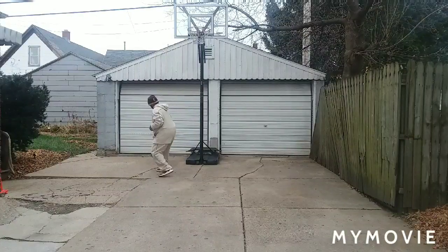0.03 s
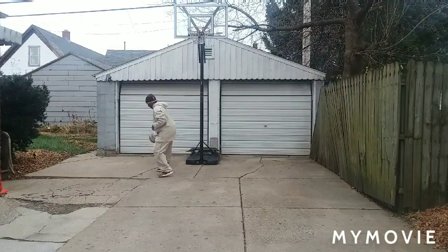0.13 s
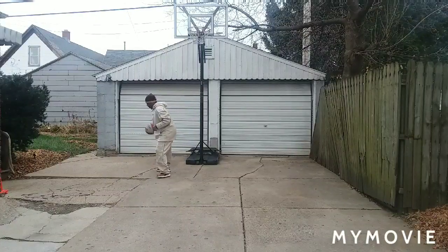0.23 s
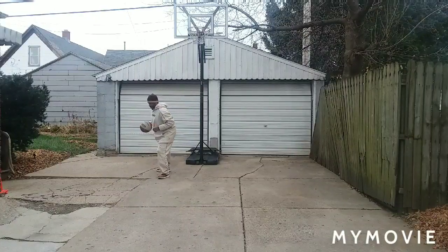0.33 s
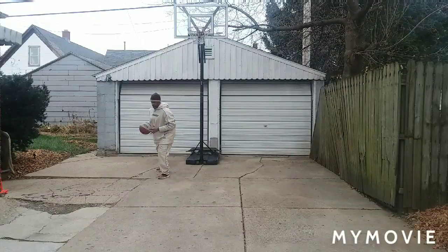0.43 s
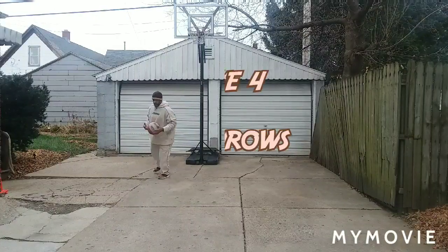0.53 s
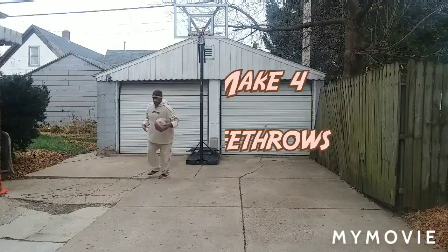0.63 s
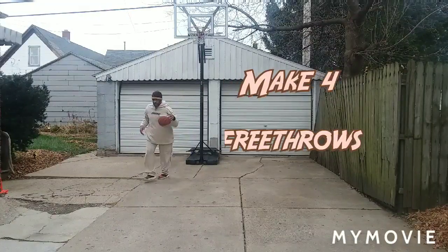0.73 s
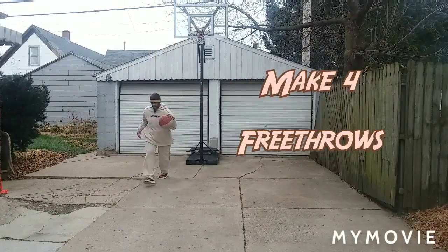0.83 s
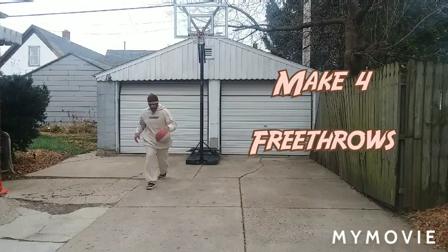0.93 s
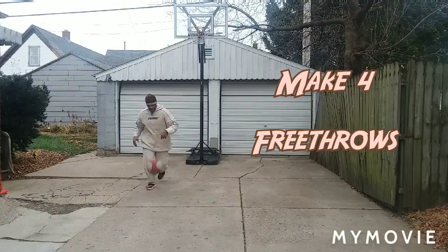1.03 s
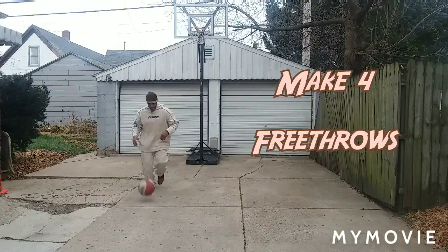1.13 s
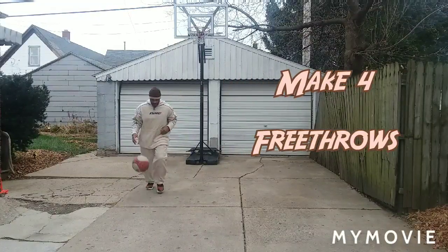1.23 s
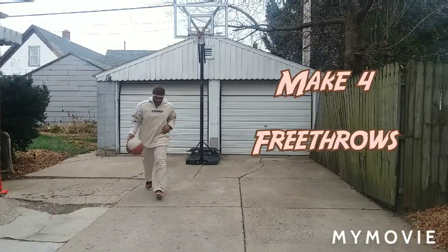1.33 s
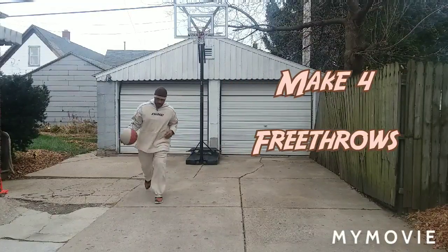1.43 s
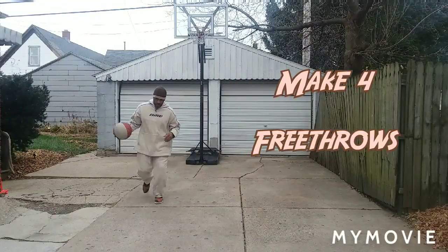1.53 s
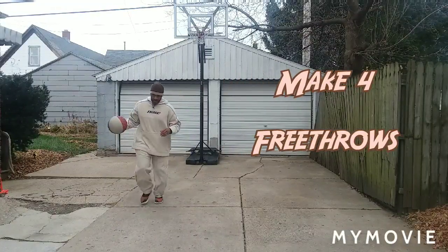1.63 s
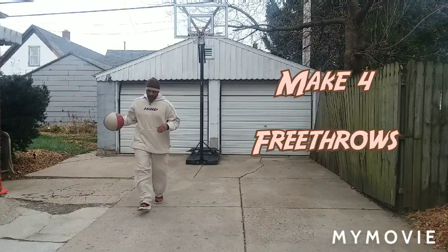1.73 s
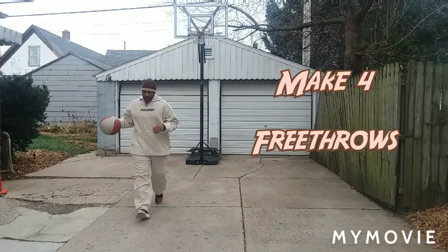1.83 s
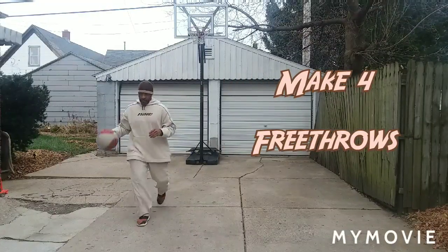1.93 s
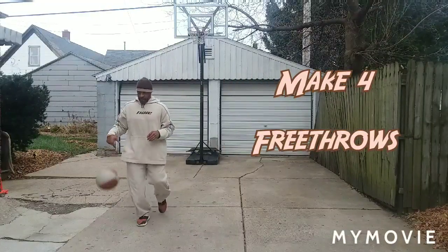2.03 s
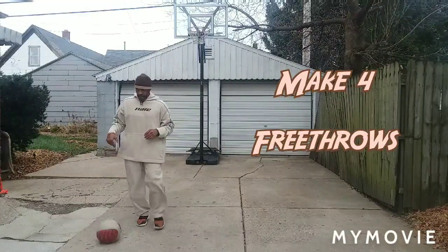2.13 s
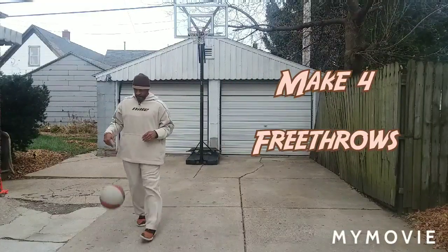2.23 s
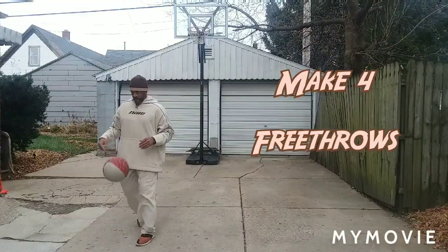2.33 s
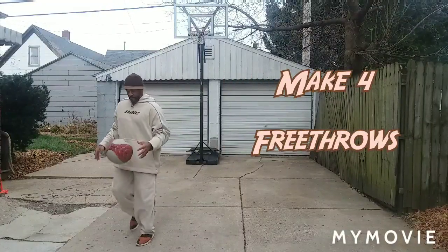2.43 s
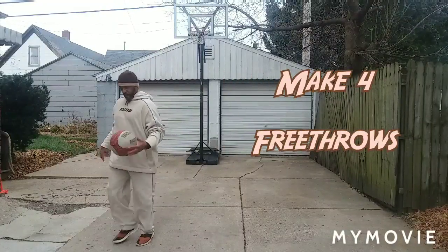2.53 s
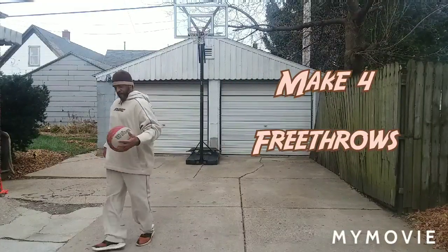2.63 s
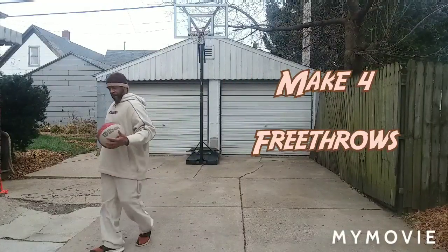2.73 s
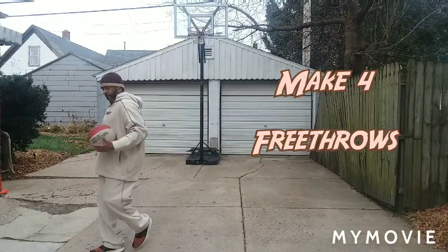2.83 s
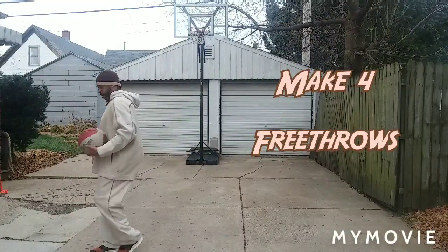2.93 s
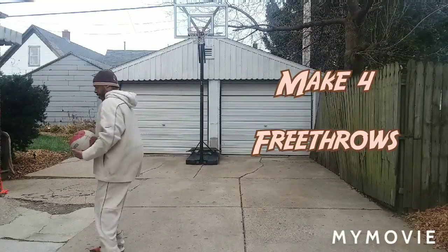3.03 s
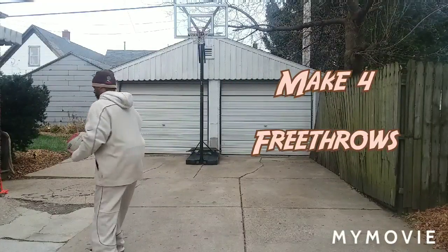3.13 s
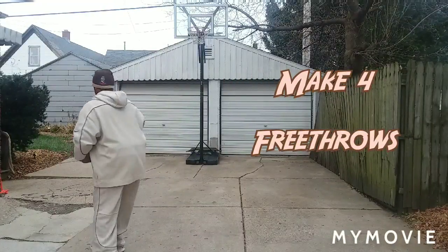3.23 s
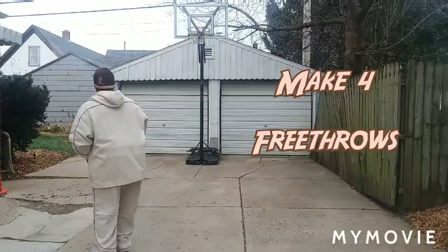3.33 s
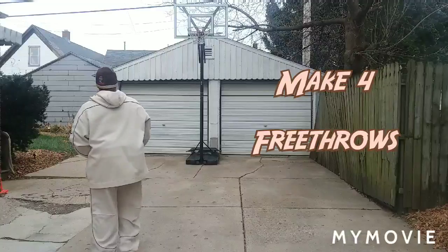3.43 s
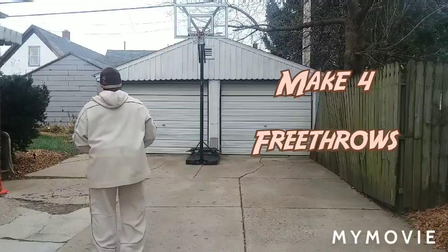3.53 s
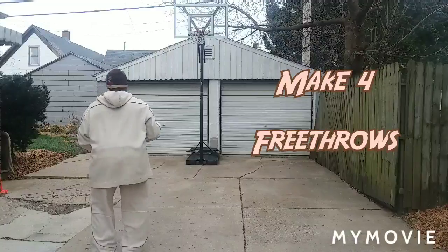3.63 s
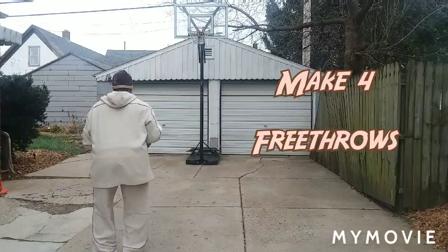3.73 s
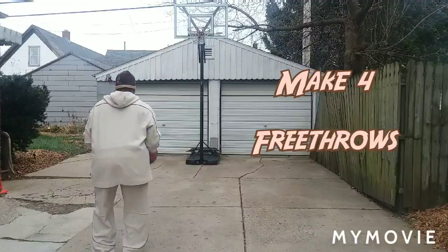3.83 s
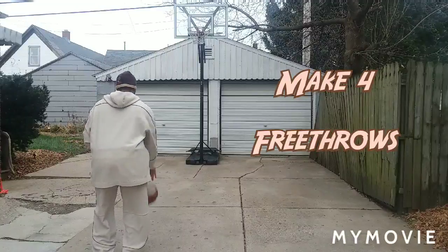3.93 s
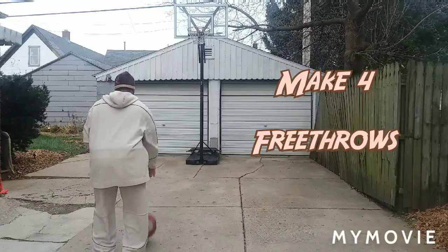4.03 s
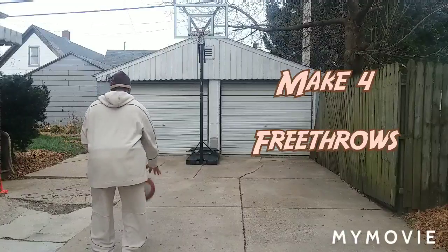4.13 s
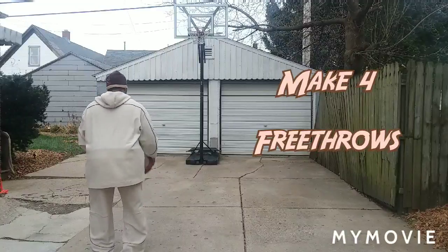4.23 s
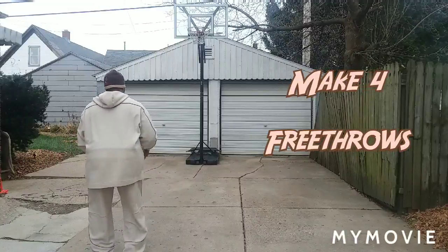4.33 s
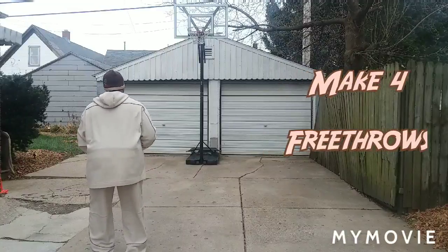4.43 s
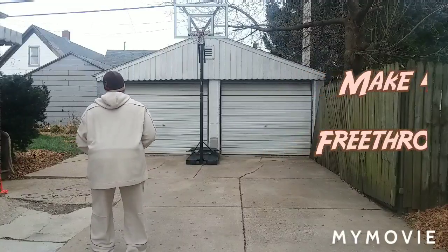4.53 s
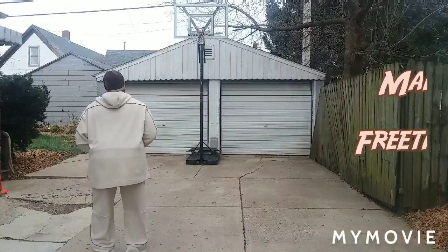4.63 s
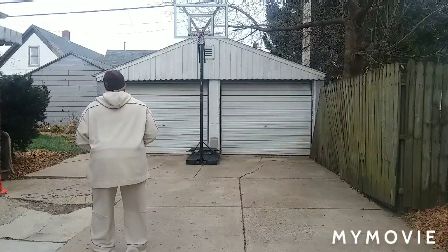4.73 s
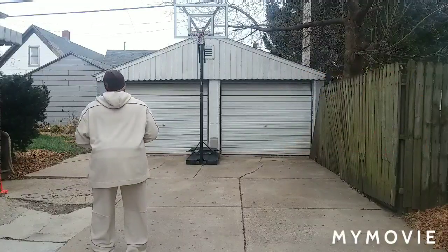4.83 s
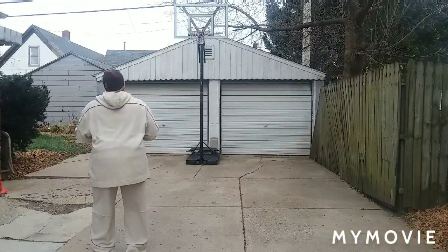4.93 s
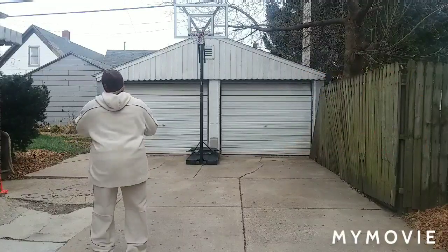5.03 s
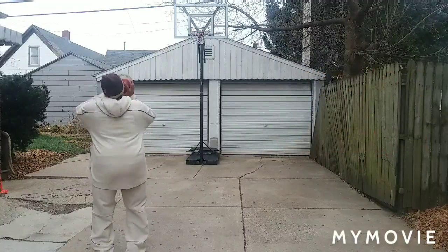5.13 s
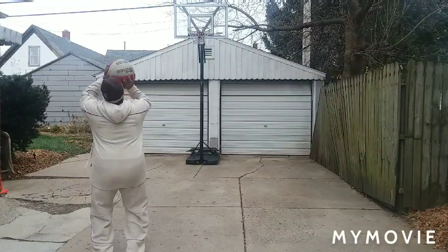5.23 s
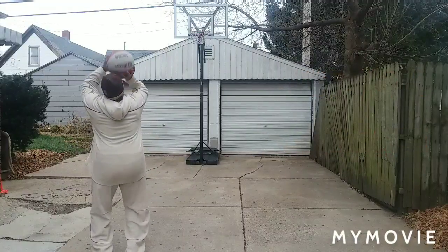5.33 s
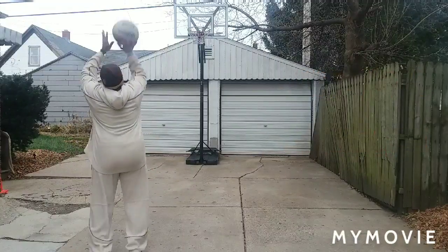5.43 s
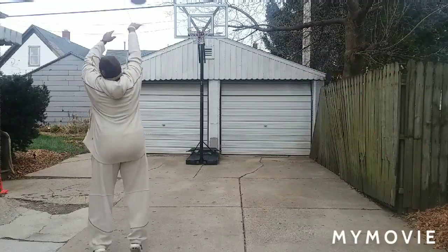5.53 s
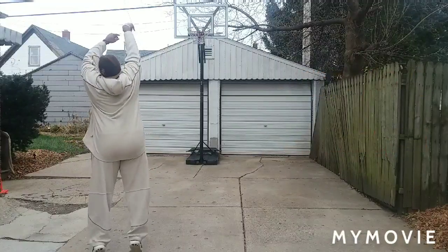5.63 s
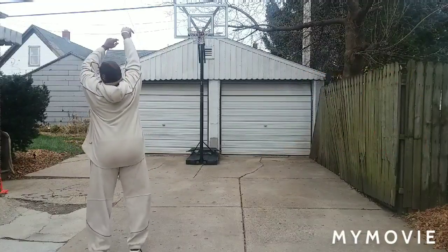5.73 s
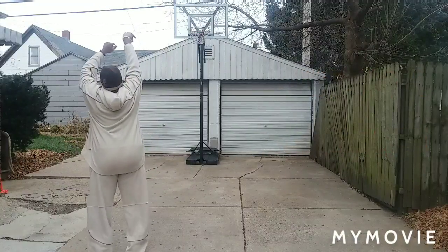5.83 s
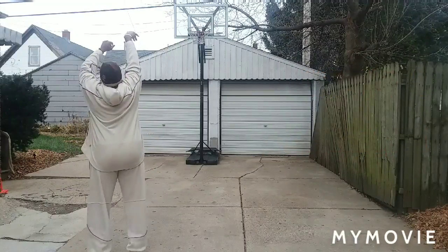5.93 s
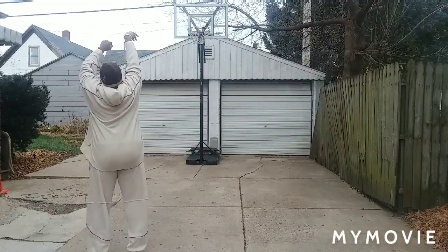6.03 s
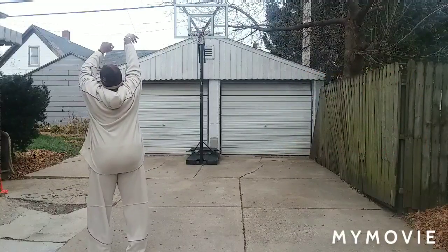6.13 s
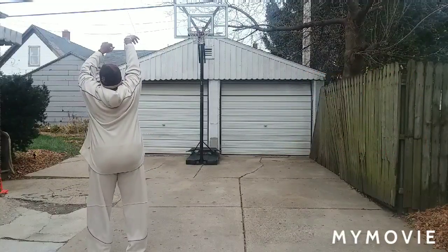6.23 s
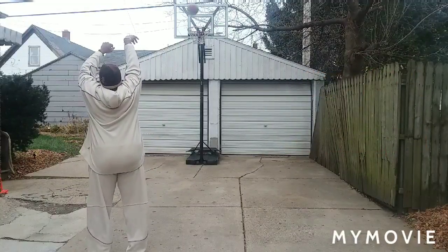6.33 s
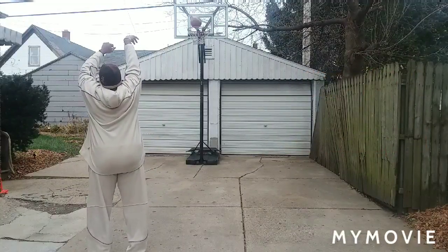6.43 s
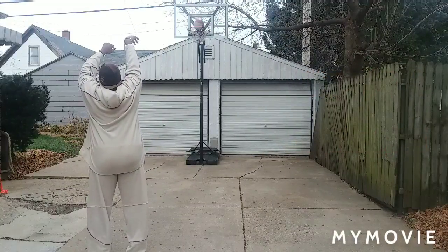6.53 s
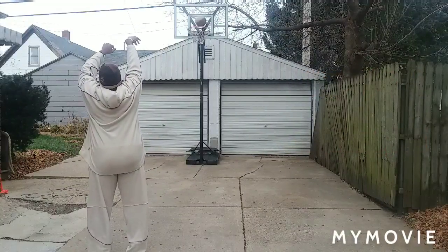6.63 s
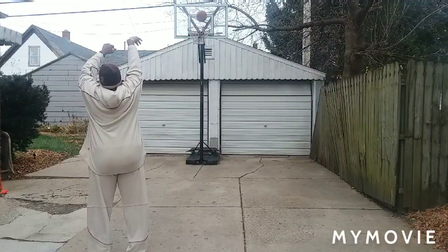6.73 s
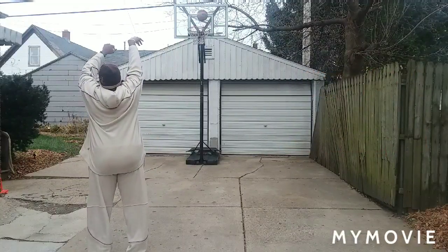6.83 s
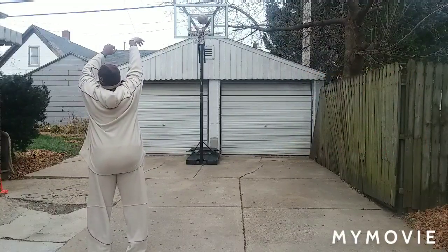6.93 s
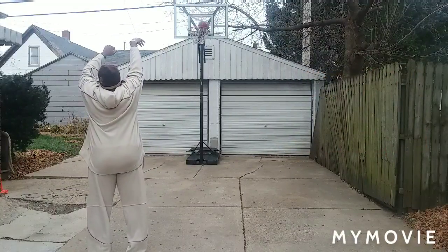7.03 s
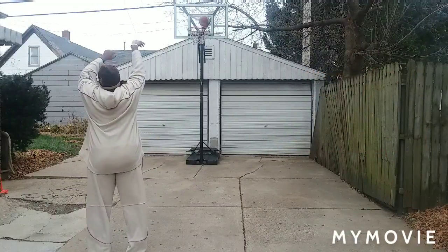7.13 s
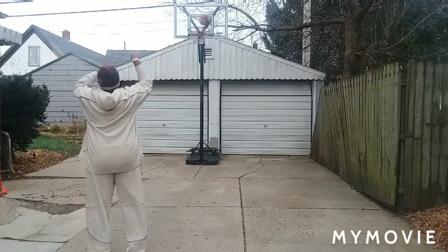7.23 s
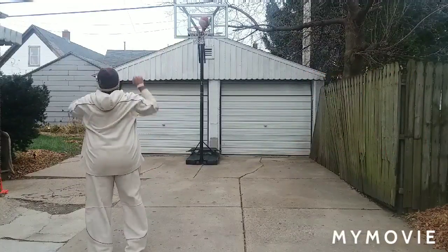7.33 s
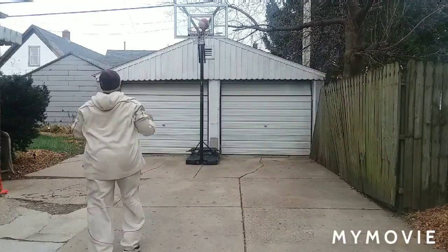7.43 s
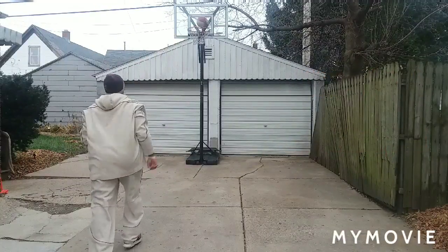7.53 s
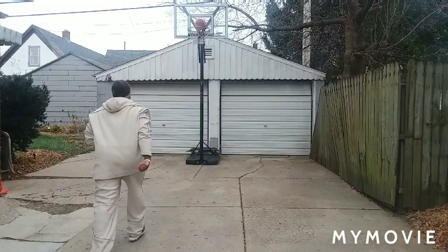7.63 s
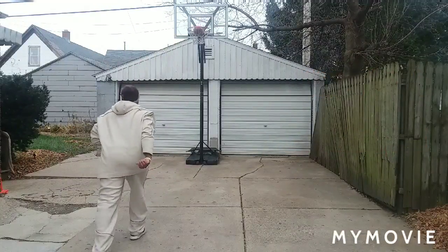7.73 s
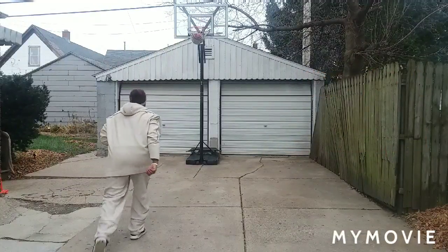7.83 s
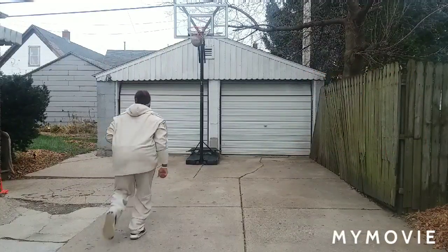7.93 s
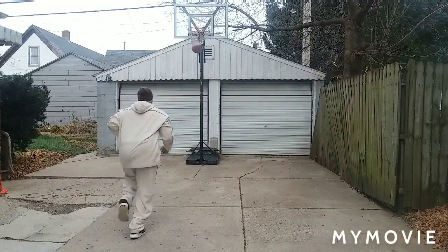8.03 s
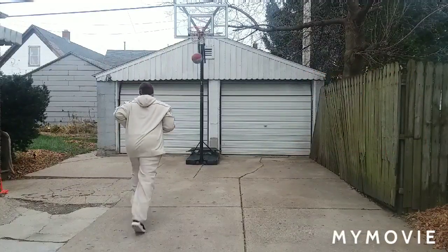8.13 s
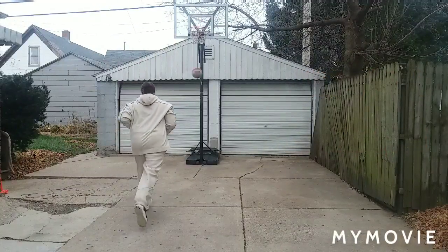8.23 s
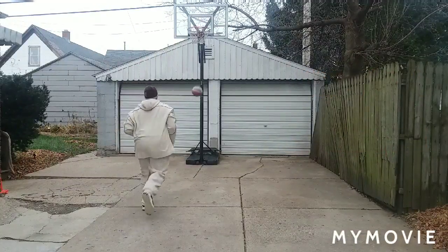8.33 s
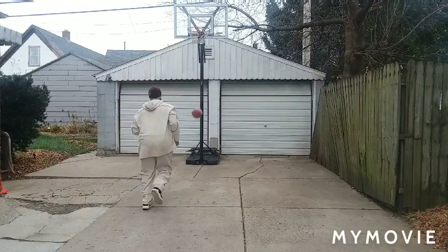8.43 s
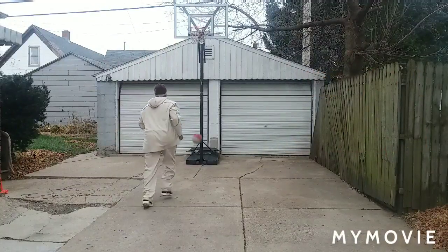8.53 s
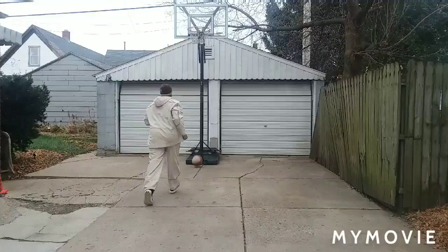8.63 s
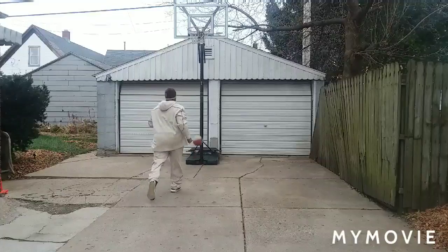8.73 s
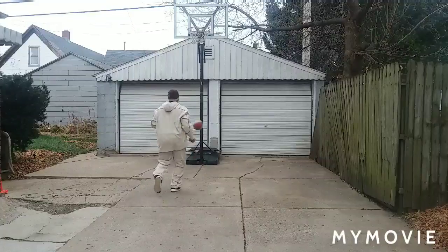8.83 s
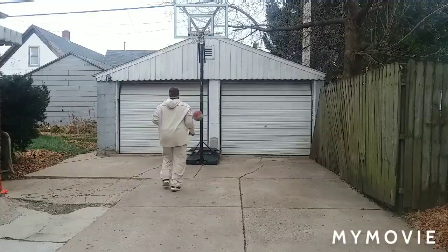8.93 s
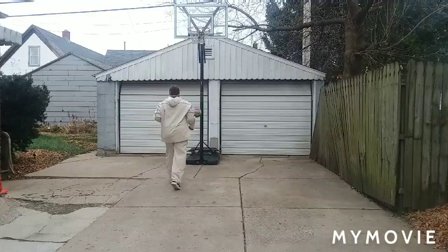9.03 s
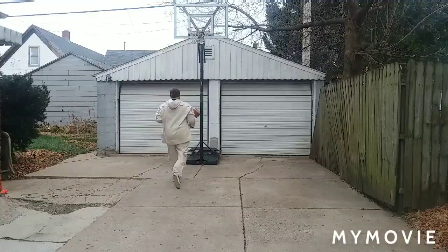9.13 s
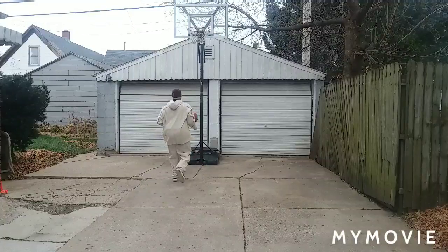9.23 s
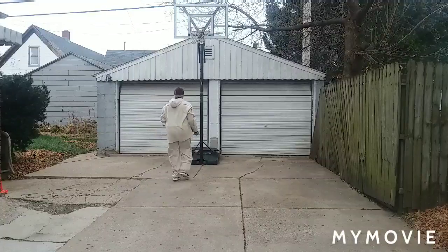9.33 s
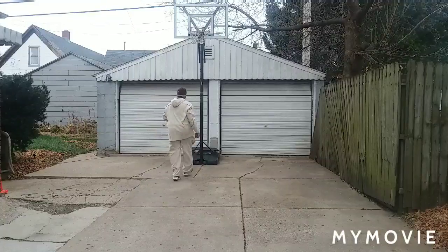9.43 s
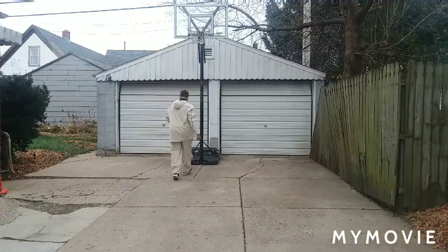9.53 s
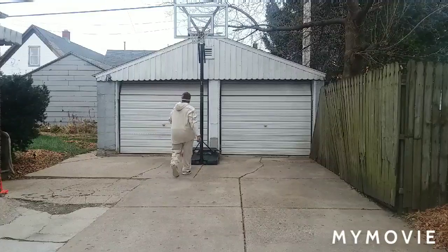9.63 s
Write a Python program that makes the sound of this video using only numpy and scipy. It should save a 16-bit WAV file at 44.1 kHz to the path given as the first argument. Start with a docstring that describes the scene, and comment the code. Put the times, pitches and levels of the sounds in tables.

```python
"""One microphone on a concrete driveway, between a wooden fence and a garage; sparrows chatter far off.
A basketball is dribbled close by, each slap echoing round the yard, and shoes scuff the grit. Out in the
street a V8 car accelerates, passes at about 4 s with pulsing exhaust and hissing tyres, changes gear and
drones away. At 6.4 s a shot hits the hoop: the steel rim clangs and rattles as it rocks on its mount.
The ball drops through and bounces twice."""
import sys
import numpy as np
from scipy import signal
from scipy.fft import rfft, irfft, next_fast_len
from scipy.io import wavfile
from scipy.ndimage import uniform_filter1d

SR = 44100
rng = np.random.default_rng(int(sys.argv[2]) if len(sys.argv) > 2 else 0)


def int16_out(signal):
    """Quantize to a 16-bit WAV file."""
    q = np.round(np.clip(np.atleast_2d(signal).T, -1, 1) * 32767)
    wavfile.write(sys.argv[1], SR, q.astype(np.int16))


N = 427329
TIME = np.arange(N) / SR
AGE = TIME[:SR]  # the second that follows a blow

# the ball's shell and the air inside: (frequency [Hz], relative level [dB], t60 [s])
BALL_MODES = [(241, -15.5, 0.031), (714, -14.5, 0.05), (863, -18, 0.03), (1022, -24.5, 0.071),
              (1166, -34, 0.02), (1226, -20, 0.052), (2270, -22.5, 0.0092), (2990, -25.5, 0.01),
              (4110, -20, 0.0057)]


def bounces():
    """The ball slaps the concrete and rings hollow; fence, walls, yard and garage door answer."""
    # (time [s], slap [dB], yard [dB], hollow ring [dB], boom [dB], fence delay [s],
    #  fence gain on the slap [dB], yard tilt [dB/octave], door [dB])
    blows = [(0.0, -14.5, -21.5, -22, -22.5, 0.0074, 2, -0.3, -34.5),
             (1.1258, -7, -24, -16, -35, 0.0062, -9.5, 1, -30),
             (2.1440, -7.5, -22.5, -10, -25, 0.0085, -9.5, 0.35, -42),
             (4.0230, -4, -22.5, -6.5, -13.5, 0.012, -17, 0, -30.5),
             (8.6517, -7, -20.5, -5.5, -17.5, .0058, -1.5, .5, -38),
             (9.5969, -9.5, -24, -23, -24.5, 0.0053, -11, -0.34, -32)]
    # low boom between the walls: (frequency [Hz], relative level [dB], t60 [s])
    boom_modes = [(82.3, 5.5, 0.087), (99.7, 3, 0.18), (128.9, -5, 0.41), (205, -5.5, 0.25),
                  (256.6, -21.5, 0.42)]
    # scatter from the yard: (frequency [Hz], relative density [dB], t60 [s])
    yard_bands = [(60.4, -33.5, 0.18), (120, 9.5, 0.25), (230, 13, 0.23), (490, -1, 0.39), (745, -12, 0.61),
                  (1220, 2.5, 0.21), (1570, -16.5, 0.64), (2350, -0.5, 0.24), (3930, -10, 0.35),
                  (6000, -19.5, 0.29), (7600, -16.5, 0.22), (8400, -30, 0.28), (15000, -36.5, 0.24)]
    # crowded modes of the sheet-metal door: (frequency [Hz], relative density [dB], t60 [s])
    door_bands = [(1850, -4.5, 0.33), (2180, -3, 0.29), (2530, -8.5, 0.52), (2900, -19, 0.28)]
    out = np.zeros(N)
    for s, slap_db, yard_db, hollow_db, boom_db, fence_s, fence_db, tilt_db, door_db in blows:
        yard = [(hz, db + tilt_db * np.log2(hz / 1000), t60) for hz, db, t60 in yard_bands]
        direct = undb(slap_db) * slap()
        add(out, s, direct)
        add(out, s + fence_s, undb(fence_db) * fence(direct))
        add(out, s + fence_s, undb(hollow_db) * blur(ring(BALL_MODES, detune=0.0018), 0.047))
        add(out, s, undb(yard_db) * burst(yard, rise_s=0.0037, grain_db=2))
        add(out, s, undb(boom_db) * ring(boom_modes, detune=0.0078) * (1 - np.exp(-AGE / 0.01)))
        add(out, s, undb(door_db) * burst(door_bands, rise_s=0.0085, grain_db=7))
    return out


def slap(contact_s=0.00008, shell_db=-1, rebound=0.26):
    """Air squeezed from under the ball makes one sharp spike; the shell rings after it."""
    shell = undb(shell_db) * ring(BALL_MODES, detune=0.015)
    late_shell = np.r_[np.zeros(int(4 * contact_s * SR)), shell][:SR]
    u = AGE / contact_s
    spike = u * np.exp(1 - u) - rebound * (u / 3) * np.exp(1 - u / 3)
    return signal.sosfilt(signal.butter(2, 7500, fs=SR, output="sos"), late_shell - spike)


def fence(x, spread_s=0.007, low_cut_hz=1500):
    """The row of boards returns the slap as a quick, bright spray of echoes."""
    boards = np.zeros(SR)
    lag, size = rng.random(14), rng.standard_normal(14)
    boards[(lag ** 2 * spread_s * SR).astype(int)] = size
    echo = signal.fftconvolve(x, boards / np.linalg.norm(boards))[:SR]
    return 2 * signal.sosfilt(signal.butter(1, low_cut_hz, "high", fs=SR, output="sos"), echo)


def hoop():
    """The rim rings, its fittings chatter and the backboard thuds as the hoop rocks to rest."""
    # a graze, the strike, two late touches: (time [s], ring [dB], rattle [dB], thud [dB], rise [s])
    hits = [(6.436, -65, -48.5, -37, 0.0013), (6.451, -25, -32, -30.5, 0.0042),
            (7.066, -70, -55, -38, 0.0014), (7.134, -63, -54, -42, 0.0046)]
    # steel rim: (frequency [Hz], relative level [dB], t60 [s])
    rim_modes = [(1356, -19, 0.31), (2299, -11, .4), (2360, -4.5, 0.16), (2467, -6, 0.23),
                 (2750, -16, 0.098), (2520, 9, 0.08), (3130, -20, .11), (4900, -20, .15), (5040, -22, .25),
                 (7000, -18, .2), (7100, -30, 0.066), (7270, -18.5, 0.45)]
    # loose fittings and backboard: (frequency [Hz], relative density [dB], t60 [s])
    fitting_bands = [(500, -7, .3), (1500, -1, 0.49), (3200, 4, 0.44), (5040, 5, 0.16), (6400, -7.5, 0.41),
                     (7400, 0, 0.24), (8650, -8, 0.21), (15000, -22, 0.48)]
    board_bands = [(50, -2.5, .3), (110, 7, 0.42), (300, 1, 0.76), (600, -7, 0.44), (1200, -9.5, 0.36),
                   (2500, -22.5, 0.29), (8000, -61, .2)]
    out = np.zeros(N)
    for s, ring_db, rattle_db, thud_db, rise_s in hits + rocking():
        steel = ring(rim_modes, detune=0.002) * (1 - np.exp(-AGE / rise_s))
        steel *= 1 + 1.6 * np.exp(-AGE / 0.015)  # the mount soaks up the first hard swing
        steel *= 1 + 0.25 * wander(260)[:SR]  # and buzzes against the ringing rim
        add(out, s, undb(ring_db) * (steel + 0.51 * blur(steel, 0.048)))
        add(out, s, undb(rattle_db) * burst(fitting_bands, rise_s, grain_db=1))
        add(out, s, undb(thud_db) * burst(board_bands, rise_s, grain_db=3.5))
    return out


def rocking(start_s=6.457, period_s=0.0917, count=11):
    """The struck hoop knocks at both ends of each swing: further hits, weakening and growing crisper."""
    k = np.arange(count)
    age = k * period_s / 2
    return_db = -50 * age * (k % 2)  # knocks of the return swing die out sooner
    ring_db = -35 - 121 * age + return_db
    rattle_db = -32 - 50.5 * age + return_db
    thud_db = -27 - 32.5 * age + return_db
    rise_s = 0.0071 * np.exp(-age / 0.4)  # wide swings clatter, small ones just tick
    return list(zip(start_s + age, ring_db, rattle_db, thud_db, rise_s))


def light_contacts():
    """Light touches of hands, shoes and ball make soft knocks and short gritty hisses."""
    # soft knocks of hands, shoes, and the ball touching rim or backboard:
    # (time [s], level [dB], centre [Hz], width [octaves], rise [s], t60 [s])
    taps = [(.262, -43, 150, 0.48, .004, 0.051), (0.322, -20, 130, 0.65, 0.0037, 0.04),
            (.502, -19.5, 116, 0.25, 0.0025, 0.084), (1.361, -37, 428, 0.23, 0.0081, 0.18),
            (7.433, -39, 1160, 0.42, 0.0015, 0.1), (7.789, -48, 1250, 0.32, 0.0082, 0.37),
            (8.089, -52.5, 2400, 0.59, 0.02, 0.3), (8.902, -31.5, 190, 0.63, .008, 0.27),
            (9.145, -36, 190, 0.42, 0.005, 0.13)]
    # shoe scuffs and a hand's pat on the ball: (time [s], level [dB])
    hisses = [(0.523, -61), (1.356, -54), (2.556, -56), (3.055, -63), (3.255, -58.5), (7.623, -53.5),
              (7.793, -54.5), (8.096, -58), (8.155, -59.5)]
    # their gritty hiss: (frequency [Hz], relative density [dB], t60 [s])
    hiss_bands = [(1510, -10, .2), (4000, -7, 0.57), (7500, -4, 0.32), (9000, 1, 0.09),
                  (15000, -16.5, 0.25)]
    out = np.zeros(N)
    for s, db, hz, octaves, rise_s, t60 in taps:
        body = [(hz * 2 ** (k * octaves), -5 * k * k, t60) for k in range(-3, 4)]
        add(out, s, undb(db) * burst(body, rise_s, grain_db=3))
    for s, db in hisses:
        add(out, s, undb(db) * burst(hiss_bands, rise_s=0.03, grain_db=4))
    return out


def engine(pass_s=3.85, growl_hz=220.1, doppler=0.067, flutter=0.2, weak_flutter=0.48):
    """Uneven V8 firing sounds many orders, multiples of the cycle rate, through the exhaust."""
    # a pull in low gear, the shift, a slower pull, easing off: (time [s], cycle rate [Hz])
    revs = [(0.0, 18.4), (1.0, 20.4), (2.4, 22.6), (2.9, 25.0), (3.9, 28.8), (4.15, 28.8), (4.35, 25.3),
            (4.7, 24.7), (5.5, 26.1), (6.1, 26.6), (6.87, 27.7), (8.1, 26.8), (8.5, 27.2), (9.69, 25.3)]
    # low drone of the 5th order, coming and going between the houses: (time [s], level [dB])
    drone_levels = [(0.7, -48.5), (2.62, -46), (2.9, -58), (3.25, -47), (3.55, -33.0), (3.9, -28),
                    (4.17, -23.5), (4.42, -32.5), (4.8, -32.5), (5.02, -30.5), (5.33, -29.0), (5.72, -40.0),
                    (5.92, -40.5), (6.1, -26.5), (6.8, -31), (7.2, -38.5), (7.5, -28.5), (7.9, -41.5),
                    (8.2, -38), (8.45, -32.5), (9.1, -46), (9.45, -53.5)]
    # growl, a resonance that orders 8 to 10 slide through: (time [s], level [dB])
    growl_levels = [(0.0, -51.5), (1.53, -59), (1.7, -48.5), (2.47, -48.5), (3.13, -42), (3.32, -27.5),
                    (4.21, -34.0), (4.37, -25.0), (4.62, -34.5), (4.81, -28.0), (5.38, -38.5), (8.33, -47),
                    (8.85, -40), (9.69, -60)]
    # weak orders: (multiple of the cycle rate, level against the mean of drone and growl [dB])
    weak_orders = [(3, -19.5), (4, -12.5), (6, -18), (7, -17), (9, -16.5), (10, -11), (11, -17.5)]
    # the pipe's upper resonances: (centre [Hz], half-width [Hz], relative level [dB])
    pipe_modes = [(335, 6.1, 0), (367.8, 8, -3.5), (355, 23, -13.5)]
    hz, drone_db, growl_db = curve(revs), curve(drone_levels), curve(growl_levels)
    phase = 2 * np.pi * np.cumsum(hz * (1 + 0.0033 * wander(14))) / SR
    side = np.tanh((TIME - pass_s) / 0.25)  # -1 coming, +1 going
    orders = [(5, drone_db, flutter)]
    # the order nearest the growl's resonance takes nearly all of its power
    shares = {k: resonance(k * hz, growl_hz * (1 - doppler * side), 10.5) for k in (8, 9, 10)}
    for k, share in shares.items():
        orders.append((k, growl_db + 10 * np.log10(share / sum(shares.values())), flutter))
    approach_db = -5.5 * (1 - side) / 2  # from the front the exhaust sounds smoother
    orders += [(k, (drone_db + growl_db) / 2 + approach_db + db, weak_flutter) for k, db in weak_orders]
    # upper orders light up in turn as they slide through the pipe's resonances
    pipe_db = passing(-40.5, at_s=3.6, half_s=0.98, steepness=1.6)
    for k, offset_db in (12, -9), (13, 0), (14, -2), (15, -9):
        power = sum(undb(db) ** 2 * resonance(k * hz, centre, width) for centre, width, db in pipe_modes)
        orders.append((k, pipe_db + offset_db + 10 * np.log10(power), flutter))
    return sum(wavering_tone(k * phase, db, depth) for k, db, depth in orders)


def wavering_tone(phase, db, depth, drift_db=0.98):
    """One order reaches the microphone by several paths between the houses, so it drifts and wavers."""
    angle = phase + 2 * np.pi * rng.random()
    peak = np.sqrt(2) * undb(db + drift_db * wander(4))
    return peak * ((1 + depth * wander(16)) * np.sin(angle) + depth * wander(22) * np.cos(angle))


def outdoor_noise():
    """Road roar and tyre hiss swell as the car passes, over a low rumble; a brief rush comes late."""
    # noise spectra: (frequency [Hz], relative density [dB])
    rumble = [(20, -30.5), (35, -8.5), (58, 11.5), (90, 12.5), (140, 9.5), (220, 7.5), (350, -18.5),
              (700, -51.5)]
    roar = [(100, -21), (220, 5), (330, 5), (460, 5.5), (650, -1), (1000, -1.5), (1600, -20), (2600, -23),
            (6000, -57.5)]
    rush = [(600, -27.5), (1100, 4), (1700, -9), (2600, -46.5)]  # tyres crossing the mouth of the driveway
    hiss = [(700, -8.5), (1500, 4), (2200, 1), (4200, -5), (5000, -18.5), (6300, -24), (9000, -47.5),
            (15000, -41.5)]  # tyres along the street
    fizz = [(2500, -19), (5000, 2), (6300, -2), (7500, 2.5), (9000, -12.5), (11000, -13.5), (15500, -16)]  # fine hiss of the tread
    # low rumble, strong at the start, sinking, swelling again after the pass: (time [s], level [dB])
    rumble_levels = [(0, -37.5), (1.0, -50.5), (1.5, -52), (2.2, -53), (2.9, -59.5), (3.4, -51),
                     (3.9, -40.5), (4.5, -44), (5.8, -37), (6.3, -44), (7.2, -41.5), (9.69, -44)]
    # a brief soft rush around the ball's landing: (peak level [dB], time [s], time to half power [s])
    late_swells = [(-50, 8.7, .2), (-47, 8.55, .1)]
    gap_db = 5 * np.exp(-((TIME - 1.99) / 0.3) ** 2)  # the tyres flare through a gap between houses
    layers = [(rumble, curve(rumble_levels) + 2 * wander(6.8)),
              (roar, passing(-45.5, at_s=3.47, half_s=1.86) + gap_db / 2 + wander(11)),
              *[(roar, passing(*swell, steepness=1.6)) for swell in late_swells],
              (rush, passing(-53.5, at_s=2.64, half_s=0.52, steepness=2.2) + 2 * wander(7.1)),
              (hiss, passing(-54, at_s=1.85, half_s=3.01, steepness=5) + gap_db + wander(7.5)),
              (fizz, passing(-72.5, at_s=2.45, half_s=0.9, steepness=3) + gap_db + wander(6.2)),
              (fizz, -84)]  # steady faint hiss
    return sum(undb(db) * shaped(rng.standard_normal(N), *np.transpose(bands)) for bands, db in layers)


def sparrows(count=700, pitch_hz=3600, pitch_spread=0.11, chirp_s=0.05, sweep=0.13):
    """A far flock's arched chirps, nearer falling calls and a few high notes, blurred by distance."""
    # the flock, which hushes as the car draws near: (time [s], level [dB])
    flock_levels = [(0, -57.5), (0.9, -60.5), (1.3, -58.5), (3.0, -74), (3.7, -58), (5.5, -59.5),
                    (7.6, -58), (8.2, -68), (9.0, -60), (9.69, -72)]
    # nearer sparrows: (time [s], level [dB])
    near_calls = [(5.4, -54), (5.76, -54.5), (6.22, -59), (7.35, -61.5), (7.98, -57.5), (8.3, -56),
                  (9.02, -59.5), (9.43, -64)]
    # one higher bird: (time [s], starting pitch [Hz], level [dB])
    high_notes = [(4.69, 6100, -70), (5.65, 5670, -69), (6.0, 5830, -73), (9.24, 5670, -68.5)]
    flock, calls, notes = np.zeros((3, N))
    for (when, length, size, turn), pitch in zip(rng.random((count, 4)), rng.standard_normal(count)):
        u = np.linspace(0, 1, int(chirp_s * (0.5 + length) * SR))
        hz = pitch_hz * np.exp(pitch_spread * pitch + sweep * np.sin(np.pi * (u + 2 * turn)))
        add(flock, when * TIME[-1], undb(8.8 * size - 2 * pitch ** 2) * chirp(hz, rasp=0.072))
    for s, db in near_calls:
        add(calls, s, undb(db) * chirp(hz=np.linspace(4400, 3040, int(0.14 * SR)), rasp=0.07))
    for s, hz, db in high_notes:
        add(notes, s, undb(db) * chirp(np.linspace(hz, 0.88 * hz, int(0.06 * SR)), rasp=0.0091))
    far_flock = unit(blur(flock, 0.058)) * undb(curve(flock_levels))
    return far_flock + blur(calls, 0.044) + blur(notes, 0.012)


def chirp(hz, rasp):
    """One swelling and fading note along a pitch path, with a rasping trill."""
    trill = 1 + rasp * np.sin(2 * np.pi * rng.uniform(80, 200) * TIME[:len(hz)])
    return np.hanning(len(hz)) * np.sin(2 * np.pi * np.cumsum(hz * trill) / SR)


def ring(modes, detune):
    """Decaying modes of alternating sign; each blow shifts them a little."""
    out = np.zeros(SR)
    for k, (hz, db, t60) in enumerate(modes):
        struck_hz = hz * (1 + detune * rng.standard_normal())
        out += (-1) ** k * undb(db - 60 * AGE / t60) * np.sin(2 * np.pi * struck_hz * AGE)
    return out


def burst(bands, rise_s, grain_db):
    """A cloud of tiny clicks whose bands each die at their own rate."""
    hz, db, t60s = np.transpose(bands)
    clicks = rng.standard_normal(SR) * undb(grain_db * np.repeat(rng.standard_normal(SR // 30), 30))
    cloud = rfft(shaped(clicks, np.r_[hz[0] / 2, hz, 2 * hz[-1]], np.r_[db[0] - 20, db, db[-1] - 40]))
    log_f = np.log(np.maximum(np.arange(len(cloud)), 1))
    out = np.zeros(SR)
    for share, t60 in zip(np.eye(len(hz)), t60s):
        band = irfft(cloud * np.interp(log_f, np.log(hz), share))
        out += band * undb(-60 * AGE / t60)
    return out * (1 - np.exp(-(AGE / rise_s) ** 2))


def blur(x, decay_s):
    """Countless reflections smear a sound; its energy stays the same."""
    tail = rng.standard_normal(SR) * np.exp(-AGE / decay_s)
    return unit(signal.fftconvolve(x, tail)[:len(x)]) * np.std(x)


def passing(peak_db, at_s, half_s, steepness=1):
    """Level in dB of a passing swell, down to half power half_s either side of the peak."""
    spreading = 1 + (2 ** (1 / steepness) - 1) * ((TIME - at_s) / half_s) ** 2
    return peak_db - 10 * steepness * np.log10(spreading)


def resonance(hz, centre_hz, half_width_hz):
    """Power passed by a flat-topped resonance, 1 at its centre."""
    return 1 / (1 + ((hz - centre_hz) / half_width_hz) ** 4)


def shaped(x, hz, db):
    """Filter x by a spectrum drawn on a log-frequency axis; rms 1."""
    size = next_fast_len(len(x))
    f = np.maximum(np.fft.rfftfreq(size, 1 / SR), 1)
    gain = undb(np.interp(np.log(f), np.log(hz), db))
    return unit(irfft(rfft(x, size) * gain, size)[:len(x)])


def wander(rate_hz):
    """Smooth random drift; rms 1."""
    step = max(int(SR / rate_hz), 1)
    held = rng.standard_normal(4096)[np.arange(N) // step % 4096]
    return unit(uniform_filter1d(uniform_filter1d(held, step), step))


def curve(table):
    """Join rows of (time [s], value) by straight lines."""
    return np.interp(TIME, *np.transpose(table))


def add(out, s, x):
    """Mix x into out from time s."""
    i = max(int(s * SR), 0)
    out[i:i + len(x)] += x[:len(out) - i]


def undb(db):
    """Decibels to gain."""
    return 10 ** (np.asarray(db) / 20)


def unit(x):
    """Scale to rms 1."""
    return x / np.sqrt(np.mean(x ** 2))


def scene():
    """Driveway, street and distant birds as they reach the one microphone."""
    return (bounces() + hoop() + light_contacts() + engine() + outdoor_noise() + sparrows())[None]


def record(dry):
    """The phone's microphone thins the bass below 45 Hz and cuts the top above 15.9 kHz."""
    thin = signal.sosfilt(signal.butter(2, 45, "high", fs=SR, output="sos"), dry)
    return signal.sosfilt(signal.ellip(10, 0.2, 80, 15900, fs=SR, output="sos"), thin)


dry = scene()
out = record(dry)
int16_out(out)
```